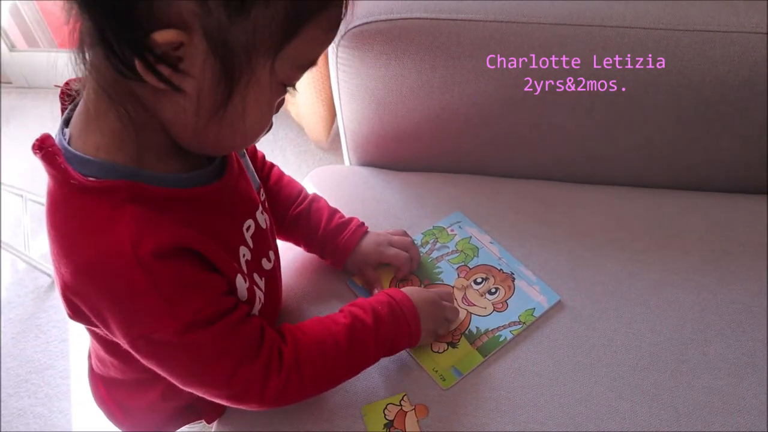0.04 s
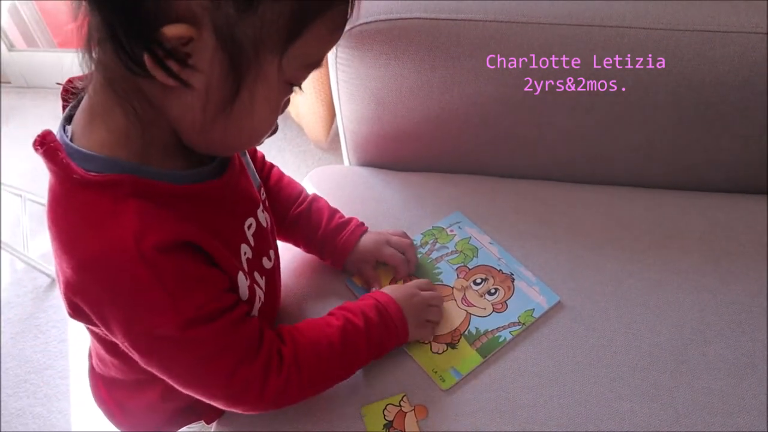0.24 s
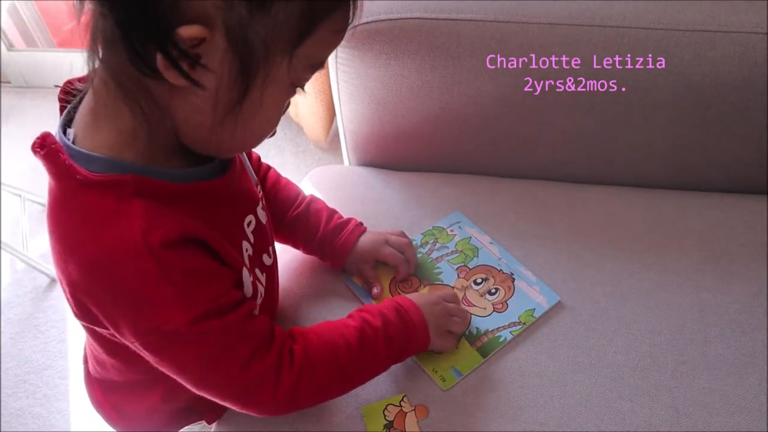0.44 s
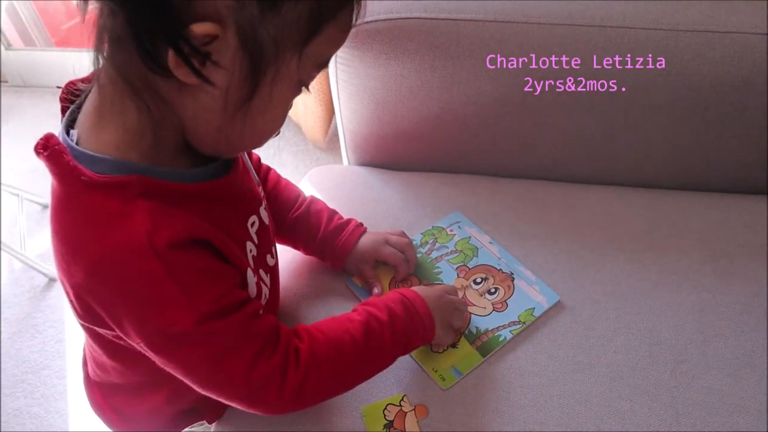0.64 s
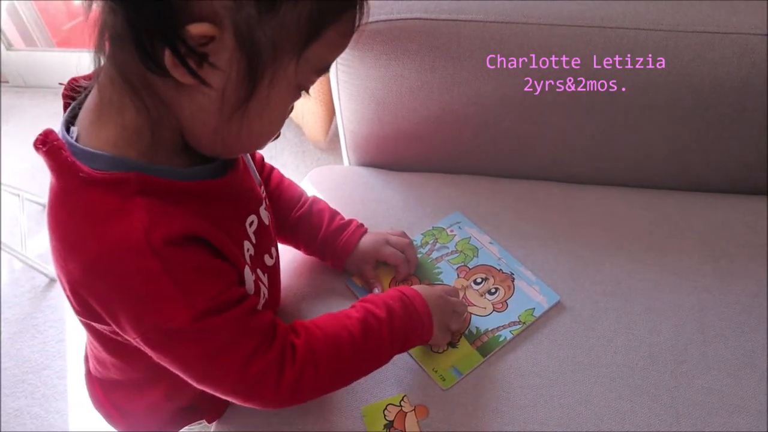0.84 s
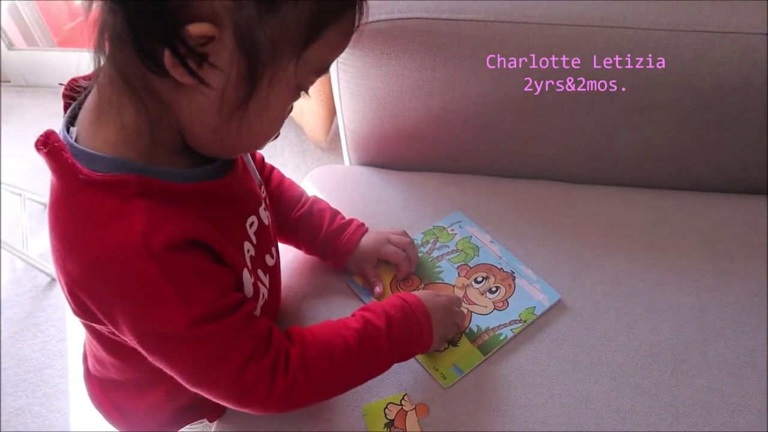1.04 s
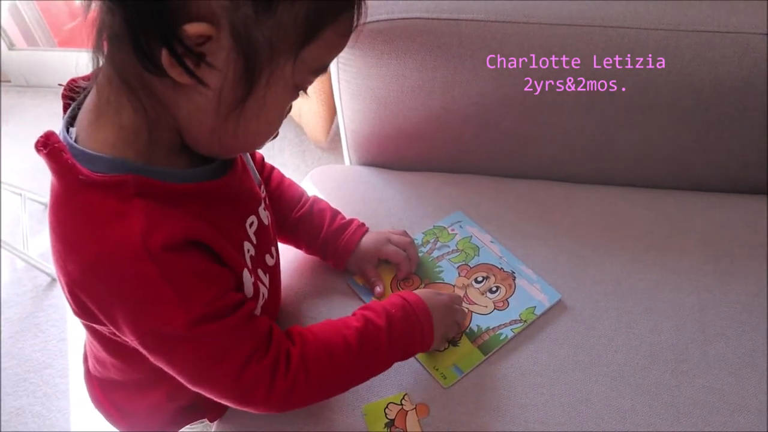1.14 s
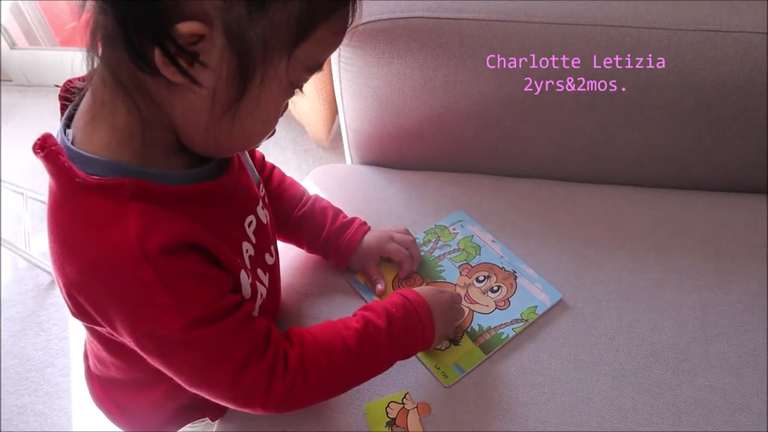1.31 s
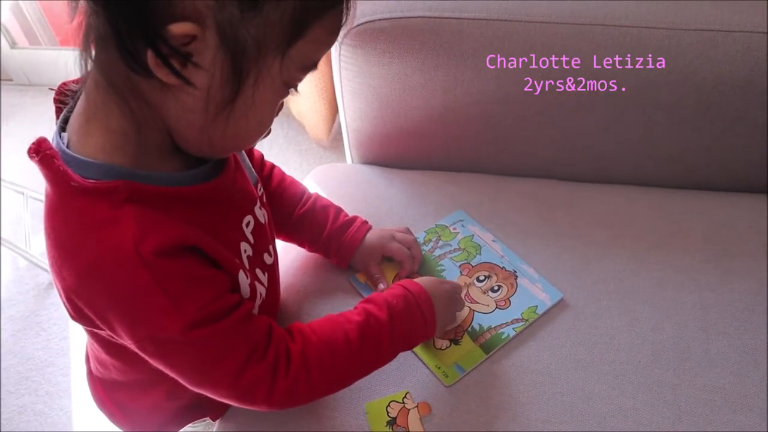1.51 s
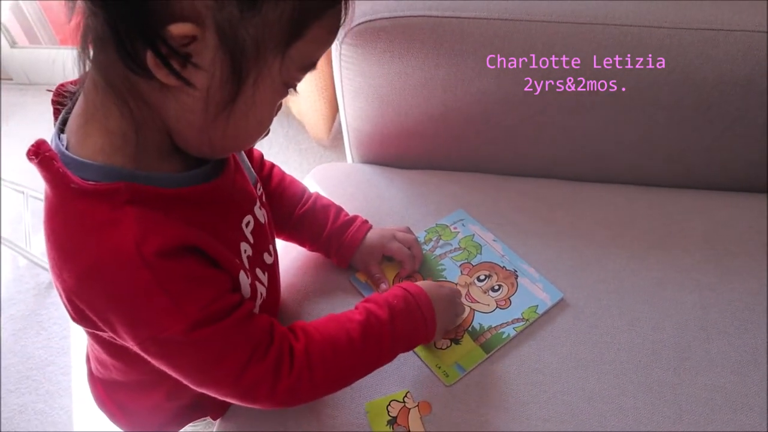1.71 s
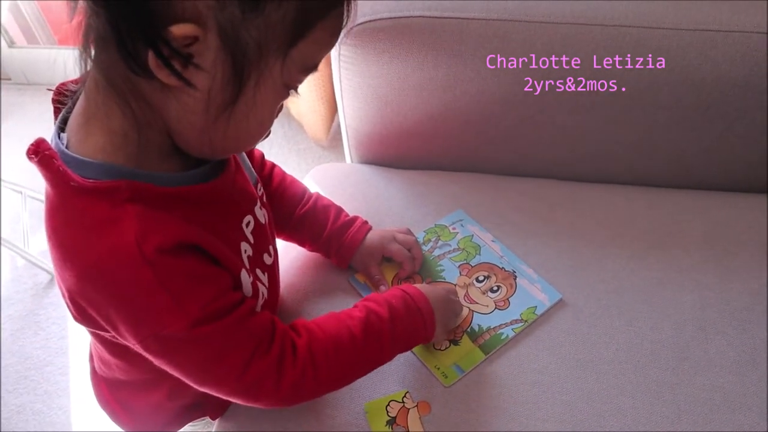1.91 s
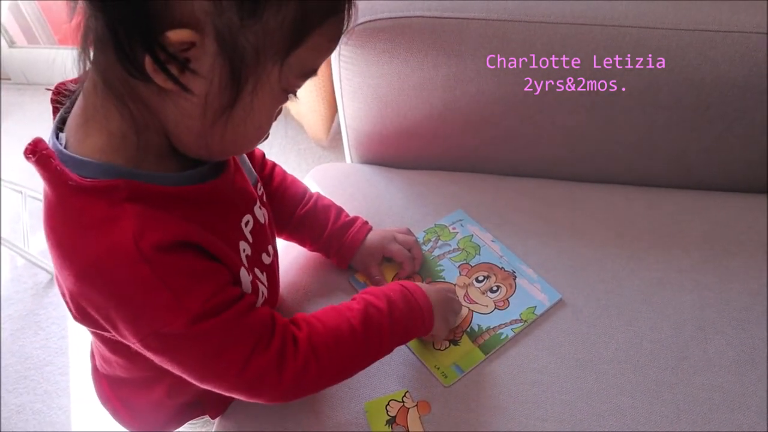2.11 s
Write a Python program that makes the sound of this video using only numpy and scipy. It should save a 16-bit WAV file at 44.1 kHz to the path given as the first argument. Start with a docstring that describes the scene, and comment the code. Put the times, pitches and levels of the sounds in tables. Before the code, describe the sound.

Close up in a quiet room, wooden puzzle pieces tap a board, knock once firmly, then clack together twice. Softer scrapes and taps follow as they are pushed into place, over a faint rustle of sleeves.

```python
"""In a quiet room, sleeves rustle while wooden puzzle pieces slide and knock on a board lying on a sofa.
The firmest knock rings the board, and the cushion beneath gives a low thump; a brief hum follows.
Near 0.5 s two pieces clack sharply together, twice, and overload the microphone.
Then pieces slide, knock and settle, with another hum and later a faint squeak.
Throughout, the room answers the wood with early reflections and a short tail."""
import sys
import numpy as np
from scipy import signal
from scipy.fft import rfft, irfft
from scipy.io import wavfile
from scipy.ndimage import uniform_filter1d

SR = 44100
rng = np.random.default_rng(int(sys.argv[2]) if len(sys.argv) > 2 else 0)


def to_wav(s):
    """Save 16-bit WAV."""
    ch = np.atleast_2d(s).T  # columns
    pcm = np.round(np.clip(ch, -1, 1) * 32767)  # PCM
    wavfile.write(sys.argv[1], SR, pcm.astype(np.int16))


N = 94815
SCENE_T = np.arange(N) / SR
IMPACT_T = np.arange(SR // 10) / SR

# left-right coherence of near sounds: f/Hz, coherence
NEAR_COHERENCE = [(100, 0.97), (300, 0.81), (1000, 0.4), (4000, 0.4), (12000, 0)]


def amp(db):
    """Amplitude ratio: tenfold for every 20 dB."""
    return 10 ** (np.asarray(db) / 20)


def unit(x):
    """Normalisation to an rms of 1."""
    return x / np.sqrt(np.mean(x ** 2) + 1e-20)


def curve_at(points, hz):
    """Interpolation on a logarithmic frequency axis."""
    f, value = np.transpose(points)
    return np.interp(np.log(hz + 1), np.log(f + 1), value)


def add(mix, start_s, sound):
    """Superposition: a stereo sound adds to the mix from start_s on."""
    part = mix[:, max(round(start_s * SR), 0):][:, :sound.shape[1]]
    part += sound[:, :part.shape[1]]


def noise_spectra(coherence, size):
    """Partial coherence: the spectra of two white noises share a common part."""
    common, independent = rfft(rng.standard_normal((2, size)))
    share = np.clip(curve_at(coherence, np.fft.rfftfreq(size, 1 / SR)), -1, 1)
    return np.array([common, share * common + np.sqrt(1 - share ** 2) * independent])


def noise(spectrum, coherence=NEAR_COHERENCE):
    """Spectral shaping: white stereo noise takes on a colour, at unit rms."""
    gain = amp(curve_at(spectrum, np.fft.rfftfreq(N, 1 / SR)))
    return unit(irfft(noise_spectra(coherence, N) * gain, N))


def fluctuation(correlation_s):
    """A moving average turns white noise into a slower random wander of unit rms."""
    return unit(uniform_filter1d(rng.standard_normal(N), int(correlation_s * SR)))


def still_air():
    """Ambient noise: the steady, mostly low floor of a quiet room."""
    # noise spectrum: f/Hz, relative density level/dB
    spectrum = [(12, -35.5), (20, -29), (163, -5.5), (234, -8), (301, -5), (337, -19.5), (422, -9),
                (642, -8), (698, -11.5), (1120, -11.5), (1370, -13), (1960, -13.5), (9950, -30.5),
                (14300, -47), (16000, -66.5)]
    # left-right coherence: f/Hz, coherence (negative in antiphase)
    coherence = [(60, 0.98), (150, 0.61), (380, 0.064), (950, -0.39), (2380, -0.44), (5980, -0.5),
                 (15000, -0.51)]
    return amp(-53) * noise(spectrum, coherence)


def sleeves():
    """Cloth friction: a dull noise whose level follows the moving arms."""
    # rustle spectrum: f/Hz, relative density level/dB
    spectrum = [(15, -8), (45, 0), (110, -4.5), (250, -7), (500, -13.5), (1200, -21), (4000, -27.5),
                (10000, -38.5), (13000, -41), (15500, -74)]
    # rustle envelope: t/s, level/dB
    envelope = [(0, -51), (.13, -48.5), (.3, -47.5), (.42, -52.5), (.7, -47.5), (.85, -59.5), (.97, -49.5),
                (1.1, -55.5), (1.33, -49.5), (1.5, -52.5), (1.7, -50), (1.85, -49), (2.02, -53),
                (2.15, -49)]
    return noise(spectrum) * amp(np.interp(SCENE_T, *np.transpose(envelope)))


def slides():
    """Sliding friction: grainy rub and hiss swell and stop with each push of a piece."""
    # pushes: start t/s, length t/s, rub level/dB, hiss level/dB, peak position/fraction of length
    strokes = [(0.11, 0.11, -53, -68, .5), (0.248, .042, -39, -45, 0.3), (0.392, 0.064, -53, -61.5, 0),
               (0.434, 0.076, -47.5, -51, 0.57), (.555, 0.065, -43, -46, 0.44),
               (0.646, 0.064, -43.5, -48, 0.91), (0.937, 0.086, -57.5, -68.5, .4),
               (1.129, 0.093, -56, -68, 0.64), (1.402, 0.057, -50.5, -57.5, 0.32),
               (1.555, 0.049, -47, -59.5, 0.22), (1.742, 0.085, -54, -61.5, 0.62)]
    # low and high bands of friction: f/Hz, relative density level/dB
    rub_spectrum = [(60, -27), (200, -8), (550, 3.5), (1000, 0), (1600, -6), (2600, -8), (4000, -18),
                    (16000, -52.5)]
    hiss_spectrum = [(500, -25.5), (2500, -3.5), (5100, -2), (6800, -5.5), (10000, -5), (12500, -10),
                     (15500, -55)]
    rub, hiss = noise(rub_spectrum), noise(hiss_spectrum)
    grain_db = 2 * fluctuation(correlation_s=0.0015)
    out = np.zeros((2, N))
    for start_s, length_s, rub_db, hiss_db, peak in strokes:
        swell = np.sqrt(np.interp((SCENE_T - start_s) / length_s, [0, peak, 1], [0, 1, 0]))
        out += swell * (amp(rub_db) * rub + amp(hiss_db) * hiss)
    return out * unit(amp(grain_db))


def room(sound):
    """Reverberation: early reflections, then a diffuse tail decaying exponentially in each band."""
    # reverberation time: f/Hz, T60/s
    decay_times = [(100, 0.2), (450, 0), (2500, 0.32), (6000, 0.29), (12000, 0.28)]
    # tail spectrum: f/Hz, level/dB
    tail_levels = [(100, -11), (280, -12.5), (430, -6.5), (700, -13), (1300, -14), (2600, -15.5),
                   (4200, -18), (6000, -18.5), (10000, -16.5), (13000, -20), (15000, -32)]
    # early reflections: left delay t/s, right delay t/s, level/dB
    reflections = [(.0018, .0017, -18), (.0034, .0034, -23), (.0084, .0085, -15)]
    hz, t, bands = signal.stft(irfft(noise_spectra(NEAR_COHERENCE, SR // 2)), SR, nperseg=256)
    rate = np.log(1000) / curve_at(decay_times, hz)[:, None]
    decay = np.exp(-rate * t) * np.sqrt(2 * rate / SR)  # unit energy at any decay rate
    tail = bands * decay * amp(curve_at(tail_levels, hz))[:, None]
    response = np.zeros((2, SR // 2))
    add(response, start_s=0.008, sound=signal.istft(tail, SR, nperseg=256)[1])
    for left_s, right_s, db in reflections:
        response[[0, 1], [round(left_s * SR), round(right_s * SR)]] += amp(db)
    return signal.fftconvolve(sound, response, axes=1)[:, :N]


def ring(modes, left_lag_s, rise_cycles):
    """Damped modes of struck wood build up, the low ones last; neighbours swing opposite ways."""
    t = np.maximum(IMPACT_T - np.array([[left_lag_s], [0]]), 0)
    out = np.zeros_like(t)
    for k, (hz, db, t60) in enumerate(modes):
        rise = 1 - np.exp(-hz * t / rise_cycles)
        decay = np.exp(-np.log(1000) * t / t60)
        out += (-1) ** k * amp(db) * rise * decay * np.sin(2 * np.pi * hz * t)
    return out


def burst(decay_s, band_hz):
    """A transient of band noise, decaying exponentially and incoherent between channels."""
    bandpass = signal.butter(4, band_hz, "band", fs=SR, output="sos")
    spray = unit(signal.sosfilt(bandpass, rng.standard_normal((2, len(IMPACT_T)))))
    return spray * np.exp(-IMPACT_T / decay_s)


def scattered(sound, scatter_db):
    """Scattering: rough edges add a dense cluster of very near treble reflections."""
    cluster = burst(decay_s=0.0019, band_hz=(880, 12500))
    cluster /= np.linalg.norm(cluster[0])
    return sound + amp(scatter_db) * signal.fftconvolve(sound, cluster, axes=1)[:, :len(IMPACT_T)]


def knocks():
    """Modal excitation: each knock of a piece drives the board's modes in its own proportions."""
    # modes of the board on its cushion: f/Hz, level/dB, T60/s
    board_modes = [(117.8, -8, 0.11), (169, -6.5, 0.081), (235.3, -4.5, 0.055), (400, -2.5, 0.023),
                   (494, -4, 0.03), (684, -3, 0.026), (1075, -2, 0.013), (1520, -3.5, .012),
                   (1792, -2.5, 0.012), (2565, -1.5, 0.0078), (3200, -6, 0.0072), (4050, -1.5, .005),
                   (5110, -4, 0.0059), (6320, -0.5, 0.0028), (8200, -6.5, .003), (10050, -1.5, 0.0031),
                   (11960, -2.5, 0.0034)]
    # drive bands (thud, hollow body, clack, snap, tick, top): f/Hz
    drive_hz = [150, 550, 1600, 2600, 5800, 10000]
    # piece on board: t/s, then level/dB in each drive band
    impacts = [(0.1275, -38.5, -39, -36.5, -60, -60, -68), (0.155, -42.5, -35, -46, -50, -60, -66),
               (.2060, -41.5, -34.5, -35, -50, -58, -68), (0.2244, -65, -65, -62, -40, -50, -32),
               (0.2436, -22.5, -24, -51, -22.5, -47, -35), (0.2454, -12.5, -12.5, -27.5, -35, -12.5, -19),
               (.6175, -31, -31.5, -29.5, -28, -52, -52), (0.7003, -27.5, -26, -39, -29.5, -56, -55),
               (0.7061, -29, -48.5, -44, -32, -52, -58), (1.2351, -54, -44, -44, -31.5, -39.5, -40.5),
               (1.245, -50, -32.5, -42, -38, -37, -45), (1.2862, -33.5, -37.5, -24.5, -39, -31.5, -36),
               (1.3503, -46, -35, -47, -61, -62, -68), (1.553, -52, -42, -43, -55, -58, -64.5),
               (1.6065, -28.5, -41.5, -36.5, -27, -33.5, -43), (1.6080, -24, -21.5, -25, -27.5, -31, -34.5)]
    out = np.zeros((2, N))
    for start_s, *levels in impacts:
        drive = list(zip(drive_hz, levels))
        modes = [(hz, db + curve_at(drive, hz), t60) for hz, db, t60 in board_modes]
        ringing = ring(modes, left_lag_s=3e-5, rise_cycles=0.25)
        add(out, start_s, scattered(ringing, scatter_db=-1.5))
    return out * amp([[-0.25], [0.25]])  # slightly to the right


def cushion():
    """A damped oscillator: the seat gives under the firmest knock with a soft, deep thump."""
    start_s, db, hz, rise_s, t60 = 0.252, -28, 55, 0.03, 0.46
    t = np.maximum(SCENE_T - start_s, 0)
    envelope = (1 - np.exp(-t / rise_s)) * np.exp(-np.log(1000) * t / t60)
    return amp(db) * envelope * np.sin(2 * np.pi * hz * t)


def hums_and_squeak():
    """Random frequency modulation: brief tones waver, swell and fade among the slides."""
    # two low hums and a faint squeak: centre t/s, half length t/s, f/Hz, level/dB
    tones = [(.325, 0.021, 430, -50.5), (0.579, .010, 410, -39), (1.428, 0.019, 5050, -58.5)]
    out = np.zeros(N)
    for centre_s, half_s, hz, db in tones:
        wavering_hz = hz * (1 + 0.023 * fluctuation(correlation_s=0.004))
        cycles = np.cumsum(wavering_hz) / SR
        swell = np.exp(-((SCENE_T - centre_s) / half_s) ** 2)
        out += amp(db) * np.sqrt(2) * swell * np.sin(2 * np.pi * cycles)
    return out


def clacks():
    """Hard impact of piece on piece: a contact crack, a low pressure pulse and a short modal ring."""
    # modes of the two pieces: f/Hz, level/dB, T60/s
    dull_modes = [(228, -31, .03), (496, -21.5, .022), (760, -27, 0.011), (1840, -11, 0.0041),
                  (2450, 1, 0.0072), (2447, -17.5, 0.025), (3040, -14, .005), (4314, -9.5, 0.0029),
                  (5500, -8, 0.0044), (11520, -21.5, .005)]
    bright_modes = [(230, -25.5, .022), (480, -18.5, 0.018), (820, -14.5, 0.013), (1210, -16, 0.0069),
                    (1720, -11, 0.0088), (2544, -2, 0.012), (3230, -5.5, .009), (4500, -8, 0.0055),
                    (5380, -6, .007), (7300, -8, 0.0064), (7830, -15.5, .007), (10060, -13.5, .007),
                    (11300, -12, 0.0054)]
    pulse_s = 0.0016
    pulse = (1 - IMPACT_T / pulse_s / 2) * np.exp(-IMPACT_T / pulse_s)
    out = np.zeros((2, N))

    def strike(modes, start_s, pulse_db, crack_db, right_bias_db):
        crack = burst(decay_s=0.0013, band_hz=(3000, 11500))
        ringing = ring(modes, left_lag_s=2e-5, rise_cycles=0.12)
        sound = amp(-0.5) * ringing + amp(pulse_db) * pulse + amp(crack_db) * crack
        balance = amp([[-right_bias_db / 2], [right_bias_db / 2]])
        add(out, start_s, scattered(sound, scatter_db=-7) * balance)

    strike(dull_modes, start_s=0.4936, pulse_db=-30.5, crack_db=-22, right_bias_db=1.5)
    strike(bright_modes, start_s=0.545, pulse_db=-22, crack_db=-9, right_bias_db=0.5)
    return out


def scene():
    """Superposition of the wood, its reverberation, the tones, the thump, the rustle and still air."""
    wood = clacks() + knocks() + slides()
    return wood + room(wood) + hums_and_squeak() + cushion() + sleeves() + still_air()


def record(dry):
    """Overload and band limiting: the loudest clacks clip at full scale, then pass a low-pass filter."""
    clipped = np.clip(dry, -1, 1)
    lowpass = signal.firwin(255, cutoff=16000, window=("kaiser", 9), fs=SR)
    return signal.oaconvolve(clipped, lowpass[None], "same", axes=1)


dry = scene()
out = record(dry)
to_wav(out)
```